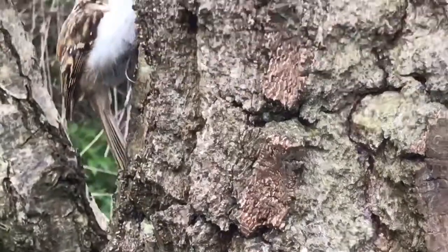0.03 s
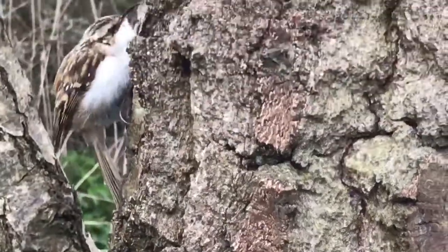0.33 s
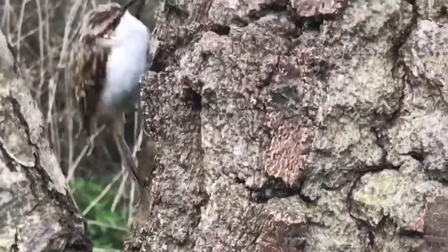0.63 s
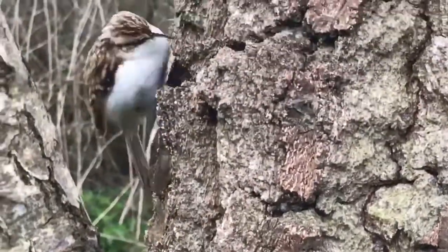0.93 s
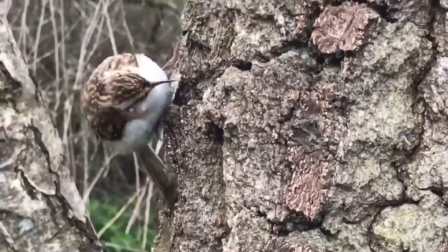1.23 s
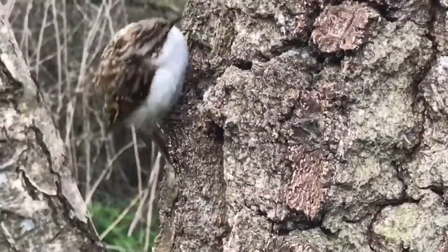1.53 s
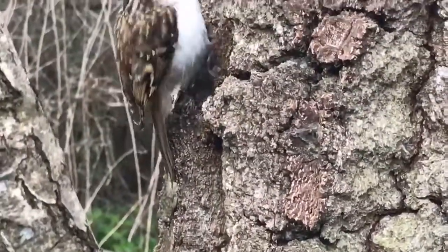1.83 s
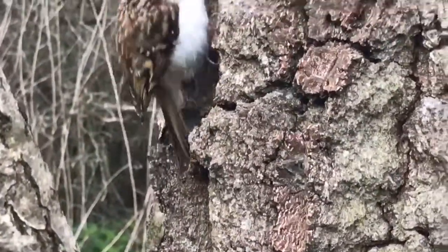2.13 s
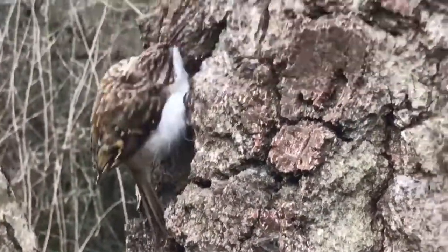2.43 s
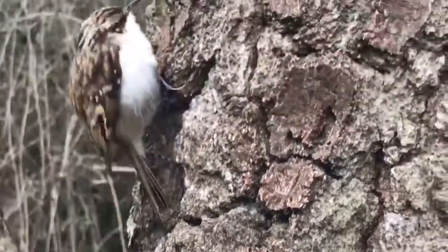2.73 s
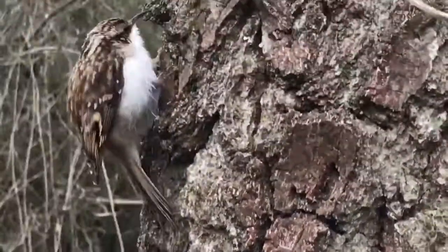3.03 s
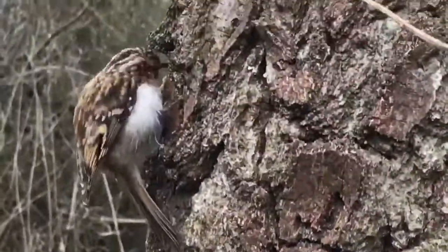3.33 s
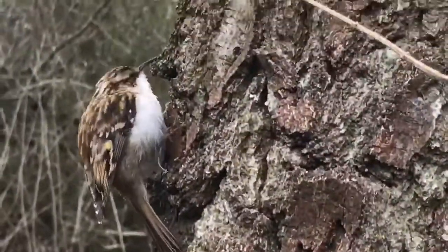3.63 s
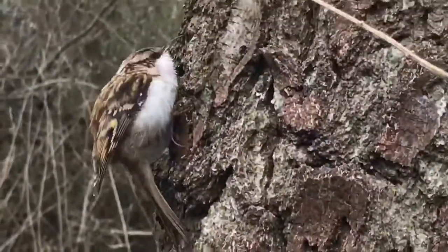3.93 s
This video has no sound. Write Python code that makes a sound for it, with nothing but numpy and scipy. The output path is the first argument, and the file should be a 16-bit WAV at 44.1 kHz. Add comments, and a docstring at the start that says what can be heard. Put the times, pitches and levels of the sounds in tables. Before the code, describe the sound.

Low, uneven wind rumble on the microphone over faint forest hiss, thin chirps and tiny clicks.

```python
"""Light wind on a bare microphone in a wood, while a small bird climbs a tree trunk.
A soft rustle fades at the start; far rush, hiss and faint crackle stay. Throughout, each eddy is a
pressure pulse that rings the microphone's bass cut; smaller ones churn between them.
From 0.15 s, brief swells of narrow-band hiss make high twitters, chirps and bark scrapes. Thin distant
bird calls enter at 0.3 s, claw and bill ticks at 0.9 s. The eddies peak near 2.8 s, thin after 3.4 s."""
import sys
import numpy as np
from scipy import signal
from scipy.fft import rfft, irfft, next_fast_len
from scipy.io import wavfile
from scipy.ndimage import map_coordinates

SR = 44100
rng = np.random.default_rng(int(sys.argv[2]) if len(sys.argv) > 2 else 0)


def digitize_waveform(pressure):
    """Quantize a signal to 16-bit integers and store it at the path in sys.argv[1].

    Rows of a 2-D input are taken as channels; values are limited to [-1, 1].
    """
    field = np.atleast_2d(pressure).T
    bounded = np.clip(field, -1, 1)
    quanta = np.round(bounded * 32767).astype(np.int16)
    wavfile.write(sys.argv[1], SR, quanta)


N = 176400

# far rush of the wood: (frequency [Hz], relative density [dB])
RUSH_SPECTRUM = [(20, -15), (55, -6), (120, -8), (250, -2.5), (450, -9.5), (700, -12.5), (1050, -13.5),
                 (1500, -19.5), (2200, -23.5), (3500, -29), (5000, -38), (9000, -44)]
# far rush: (time [s], level [dB])
RUSH_LEVEL = [(0, -57), (.2, -55.5), (1.2, -56.5), (2.2, -56), (3.2, -57), (4, -58.5)]
# hiss of twigs and dry stems: (frequency [Hz], relative density [dB])
HISS_SPECTRUM = [(1000, -28), (3000, 3.5), (4200, 4.5), (5000, 1), (6200, 4), (7700, -3.5), (9000, 0),
                 (10400, -7), (11500, -1.5), (15500, -3.5)]
# hiss: (time [s], level [dB])
HISS_LEVEL = [(0, -72), (.6, -71), (1.1, -73), (1.7, -71.5), (2.3, -74), (4, -75)]
# opening rustle: (frequency [Hz], relative density [dB])
RUSTLE_SPECTRUM = [(600, 1), (1500, 1), (2600, 1), (4500, -4), (6500, -11), (10000, -29)]
# distant bird notes: (onset [s], length [s], pitch [Hz], level [dB])
BIRD_NOTES = [(0.28, .05, 4930, -73), (0.331, 0.047, 4850, -68.5), (.56, .05, 5020, -74),
              (0.622, 0.076, 4940, -67.5), (0.673, .045, 4916, -70), (0.642, .04, 7300, -72),
              (0.77, .035, 4700, -73), (1.645, .018, 4560, -67), (1.744, .014, 4560, -69),
              (1.942, .04, 4300, -74), (2.436, 0.021, 3950, -69.5), (2.645, .03, 4720, -74),
              (3.155, 0.018, 4690, -68), (3.728, 0.027, 5040, -69), (3.745, 0.031, 4910, -66.5)]
# short high bird twitters, chirps and bark scrapes:
# (time [s], level [dB], Gaussian sigma [s], band centre [Hz])
HISS_SWELLS = [(.15, -72, .01, 7300), (.27, -74, 0.022, 6260), (0.533, -72, .025, 4240),
               (.57, -73.5, 0.033, 7000), (.696, -70, .005, 9300), (0.931, -76, 0.01, 6900),
               (1.365, -66, .005, 6700), (1.39, -67, .004, 6700), (1.483, -75, 0.018, 6000),
               (1.7, -67, .004, 8200), (1.702, -67, 0.01, 4430), (1.748, -66.5, 0.0075, 4500),
               (1.762, -66, .004, 6500), (2.438, -77, .015, 6060), (2.66, -75, .01, 6100),
               (2.805, -76, 0.011, 6100), (3.583, -74, .012, 6100), (3.586, -66.5, .004, 7940),
               (3.78, -76, .02, 6200), (3.905, -76.5, .015, 6700)]
# bark ticks: (time [s], level [dB])
TICKS = [(.855, -56.5), (.942, -54.5), (1.365, -62), (1.387, -61), (1.699, -64), (2.058, -64), (2.557, -64),
         (3.23, -57), (3.377, -50), (3.459, -52), (3.471, -62), (3.539, -56.5)]
# ticks and crackle: (frequency [Hz], relative density [dB])
BARK_SPECTRUM = [(1500, -18), (4000, -8), (7000, -6.5), (12500, 0), (15500, 1.5)]
# churning air: (time [s], level [dB])
CHURN_LEVEL = [(0, -41.5), (.16, -45.5), (.3, -49), (.43, -46), (.6, -46.5), (.74, -39.5), (.92, -40),
               (1.1, -45.5), (1.24, -45), (1.38, -49), (1.48, -40), (1.67, -49), (2.05, -44.5),
               (2.38, -47.5), (2.8, -45.5), (2.95, -50.5), (3.1, -46), (3.3, -54.5), (3.4, -51),
               (3.52, -49.5), (3.72, -55), (4, -52)]
# strong eddies: (time [s], relative peak [dB], half width [ms])
EDDIES = [(0.007, -31, 1.1), (0.031, -27, 1.2), (0.128, -20.5, 1.51), (0.243, -29.5, 0.81),
          (0.261, -29, 1.07), (0.344, -25, 1.6), (0.534, -33, 0.74), (0.575, -34, 1.25),
          (0.594, -27.5, 1.3), (0.621, -26.5, 1.4), (0.645, -26, 1.86), (0.661, -28, 1.1),
          (0.71, -23.5, 0.88), (0.723, -24, 0.47), (0.735, -25.5, 0.36), (0.747, -25.5, 0.4),
          (0.775, -22.5, 0.93), (0.805, -24, 1.5), (0.844, -22, 0.59), (0.876, -21, 0.67),
          (0.887, -25.5, 0.73), (0.908, -29, 1.2), (0.925, -26, 0.85), (0.955, -32, 0.65),
          (1.009, -27, 1.4), (1.063, -26, 0.83), (1.108, -24.5, 1.36), (1.168, -26.5, 1.4),
          (1.193, -30, 1.03), (1.438, -25.5, 1.7), (1.474, -31, 0.61), (1.489, -34.5, 0.78),
          (1.504, -34, 0.9), (1.554, -30.5, 0.98), (1.725, -29, 1.44), (1.771, -30, 0.74), (1.785, -20, 2),
          (1.813, -25.5, 1.54), (1.852, -27, 1.38), (1.874, -19.5, 3.2), (1.934, -32, 3.1),
          (1.996, -25, 2.05), (2.03, -27, 1.5), (2.07, -27, 1.02), (2.125, -26, 1.5), (2.19, -28.5, 1.4),
          (2.207, -29, 1.44), (2.254, -33, 3.5), (2.375, -27, 3.6), (2.465, -25, 2), (2.529, -23.5, 1.7),
          (2.558, -23, 2.6), (2.641, -27, 2), (2.693, -20, 2.74), (2.732, -23, 2.26), (2.766, -24.5, 2),
          (2.809, -36, 1.3), (2.824, -27.5, 0.92), (2.84, -17, 1.6), (2.872, -21, 1.44),
          (2.982, -27.5, 2.6), (3.047, -25.5, 1.55), (3.081, -20, 1.75), (3.122, -22.5, 1.1),
          (3.198, -19, 1.9), (3.237, -27, 2.5), (3.36, -31, 1.27), (3.381, -29.5, 1.75), (3.41, -25.5, 3.4),
          (3.518, -34.5, 2.5), (3.845, -35.5, 2.4)]
# microphone resonances: (frequency [Hz], Q, gain)
MIC_RESONANCES = [(65.4, 3.9, 0.29), (372, 1.57, 0.6)]  # bass-cut ring, air at the opening


def amp(db):
    """Decibels to gain."""
    return 10 ** (np.asarray(db) / 20)


def unit(x):
    """Scale to rms 1."""
    return x / np.sqrt(np.mean(x ** 2) + 1e-20)


def clock():
    """Sample times in s."""
    return np.arange(N) / SR


def curve(rows, t):
    """Linear interpolation of (time [s], value) rows."""
    return np.interp(t, *np.transpose(rows))


def wobble(knots_per_s):
    """Smooth random curve, rms near 1."""
    knots = rng.standard_normal(int(N * knots_per_s / SR) + 4)
    return map_coordinates(knots, [clock() * knots_per_s])


def filtered(x, response):
    """Zero-phase filter with gain response(hz)."""
    size = next_fast_len(N + SR // 2)
    return irfft(rfft(x, size) * response(np.fft.rfftfreq(size, 1 / SR)), size)[:N]


def noise(spectrum):
    """Noise of rms 1, shaped by (frequency [Hz], relative density [dB]) rows."""
    knots_hz, db = np.transpose(spectrum)
    white = rng.standard_normal(N)
    return unit(filtered(white, lambda hz: amp(np.interp(np.log(hz + 1), np.log(knots_hz), db))))


def butter(x, hz, kind, order=4):
    """Causal low-pass or high-pass."""
    return signal.sosfilt(signal.butter(order, hz, kind, fs=SR, output="sos"), x)


def wood():
    """Dull far rush and fine twig hiss, both slightly unsteady."""
    t = clock()
    rush = amp(curve(RUSH_LEVEL, t) + 0.5 * wobble(7.14)) * noise(RUSH_SPECTRUM)
    hiss = amp(curve(HISS_LEVEL, t) + wobble(16)) * noise(HISS_SPECTRUM)
    return rush + hiss


def crackle(level_db=-81.5, swing_db=10):
    """Faint scattered crackle of bark and twigs."""
    bursts = unit(amp(swing_db * np.minimum(wobble(110), 2)))
    return amp(level_db) * bursts * noise(BARK_SPECTRUM)


def rustle(start_db=-60.5, fade_db_per_s=56):
    """Soft broad rustle, dying away at the start."""
    return amp(start_db - fade_db_per_s * clock()) * noise(RUSTLE_SPECTRUM)


def distant_birds(fall_fraction=0.008, waver_fraction=0.0026, echo_db=-3.5, echo_t60_s=0.56):
    """Thin, slightly falling whistles that echo among the trunks."""
    t, calls = clock(), np.zeros(N)
    waver = waver_fraction * wobble(120)
    for onset_s, length_s, hz, db in BIRD_NOTES:
        progress = np.clip((t - onset_s) / length_s, 0, 1)
        pitch_hz = hz * (1 + fall_fraction * (0.5 - progress) + waver)
        envelope = amp(db) * np.sqrt(np.abs(np.sin(np.pi * progress)))
        calls += envelope * np.sin(2 * np.pi * np.cumsum(pitch_hz) / SR)
    tail = rng.standard_normal(SR) * amp(-60 * t[:SR] / echo_t60_s)
    echo = signal.fftconvolve(calls, tail / np.linalg.norm(tail))[:N]
    return calls + amp(echo_db) * echo


def twitters_and_scrapes(sigma_oct=0.19, grain_db=1.7):
    """Brief swells of grainy narrow-band hiss: high bird twitters, chirps and bark scrapes."""
    t, swells = clock(), np.zeros(N)
    for time_s, db, sigma_s, centre_hz in HISS_SWELLS:
        white = rng.standard_normal(N)
        band = filtered(white, lambda hz: np.exp(-0.5 * (np.log2((hz + 1) / centre_hz) / sigma_oct) ** 2))
        swells += amp(db) * np.exp(-0.5 * ((t - time_s) / sigma_s) ** 2) * unit(band)
    return swells * unit(amp(grain_db * wobble(250)))


def ticks(crack_t60_s=0.008, tail_db=-11, tail_t60_s=0.041):
    """Claws and bill click on bark: a crack and a faint short tail."""
    t, envelope = clock(), np.zeros(N)
    for time_s, db in TICKS:
        age_s = np.maximum(t - time_s, 0)
        crack = amp(-60 * age_s / crack_t60_s)
        tail = amp(tail_db - 60 * age_s / tail_t60_s)
        envelope += (t >= time_s) * amp(db) * (crack + tail)
    return envelope * noise(BARK_SPECTRUM)


def mic_pulses(rows, bass_cut_hz=49.5, top_hz=740):
    """Bell-shaped pressure pulses of random sign ring the microphone; rows as in EDDIES."""
    t, pressure, reach = clock(), np.zeros(N), SR // 10
    for (time_s, db, half_width_ms), sign in zip(rows, rng.choice([-1, 1], len(rows))):
        centre = int(time_s * SR)
        near = slice(max(centre - reach, 0), max(centre + reach, 0))
        offset_ms = (t[near] - time_s) * 1000
        pressure[near] += sign * amp(db) / (1 + (offset_ms / half_width_ms) ** 2)
    for hz, q, gain in MIC_RESONANCES:
        pressure += gain * signal.lfilter(*signal.iirpeak(hz, q, fs=SR), pressure)
    return butter(butter(pressure, bass_cut_hz, "high"), top_hz, "low")


def churn(eddies_per_s=130, base_half_width_ms=2.65, base_db=-46, db_per_halving=7.5, spread_db=3):
    """Many small random eddies; stronger wind makes them narrower."""
    count = int(eddies_per_s * N / SR)
    time_s = (np.arange(count) + rng.random(count)) / eddies_per_s
    size, width = rng.standard_normal((count, 2)).T
    halvings = (curve(CHURN_LEVEL, time_s) - base_db) / db_per_halving
    half_width_ms = np.clip(base_half_width_ms * np.exp(0.28 * width) / 2 ** halvings, 0.4, 3)
    db = spread_db * np.clip(size, -2, 1.5) - 10 * np.log10(half_width_ms)
    pulses = mic_pulses(np.column_stack([time_s, db, half_width_ms]))
    return amp(curve(CHURN_LEVEL, clock())) * unit(pulses)


def eddies(gain_db=-0.13, shed_count=4, shed_db=-11, shed_spread_s=0.007026):
    """Strong eddies hit the microphone, each shedding smaller ones just before and after."""
    time_s, db, half_width_ms = np.repeat(EDDIES, shed_count, axis=0).T
    delay, size, width = np.clip(rng.standard_normal((len(time_s), 3)), -1.7, 1.7).T
    shed = np.column_stack([time_s + shed_spread_s * delay,
                            db + shed_db + 2 * size,
                            half_width_ms * 0.96 * np.exp(0.11 * width)])
    return amp(gain_db) * mic_pulses(np.vstack([EDDIES, shed]))


def scene():
    """Wind on the microphone over the quiet wood, mono."""
    wind = eddies() + churn()
    forest = wood() + rustle() + ticks() + crackle() + twitters_and_scrapes() + distant_birds()
    return (wind + forest)[None]


def record(dry, top_hz=15850):
    """Brick-wall band limit."""
    return filtered(dry[0], lambda hz: hz < top_hz)[None]


dry = scene()
out = record(dry)
digitize_waveform(out)
```